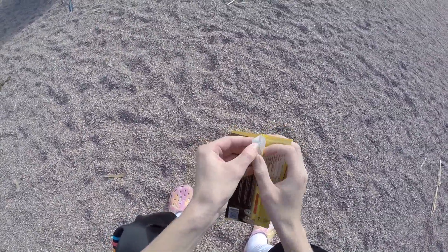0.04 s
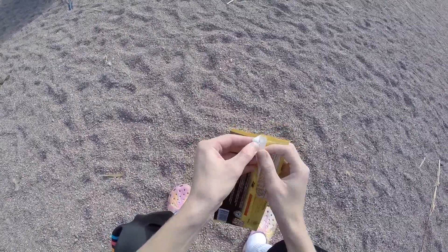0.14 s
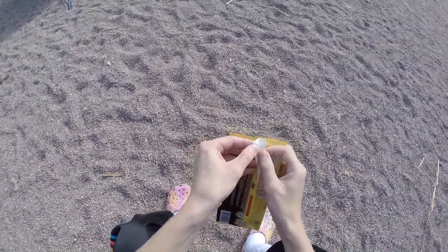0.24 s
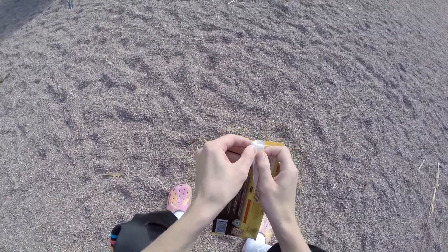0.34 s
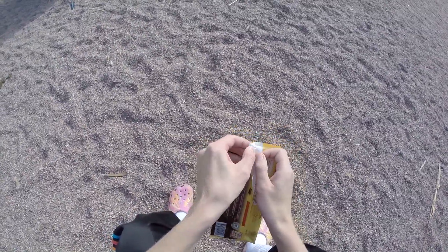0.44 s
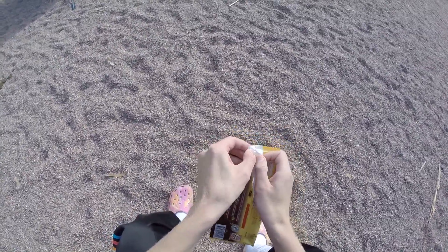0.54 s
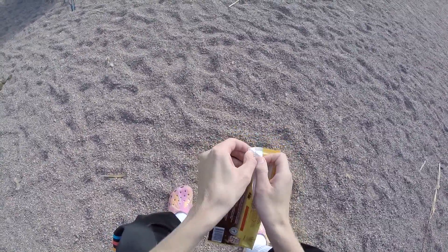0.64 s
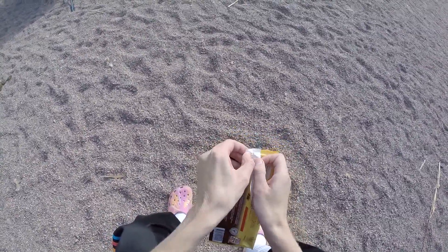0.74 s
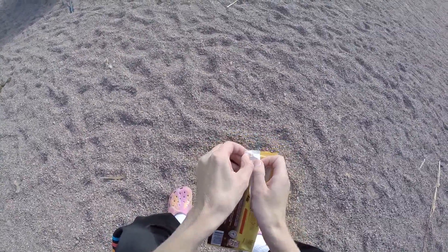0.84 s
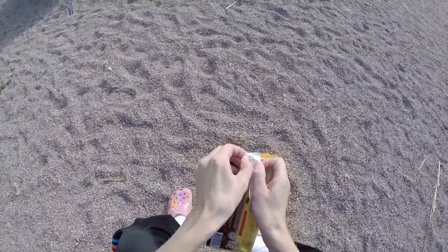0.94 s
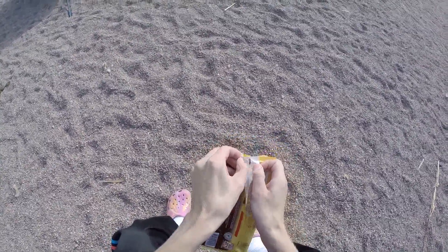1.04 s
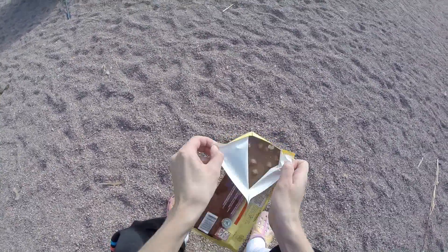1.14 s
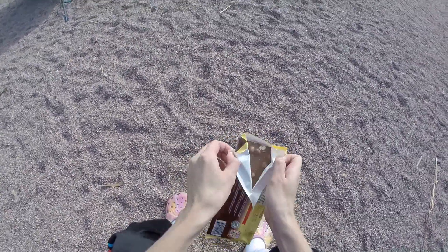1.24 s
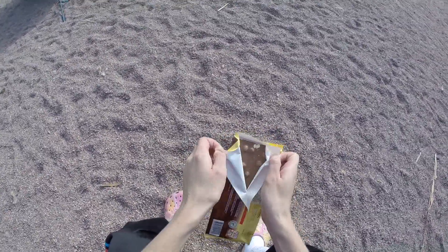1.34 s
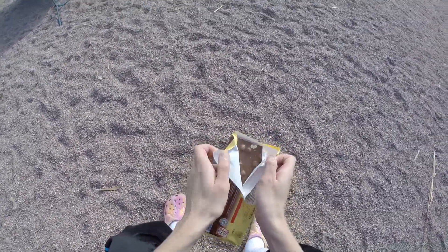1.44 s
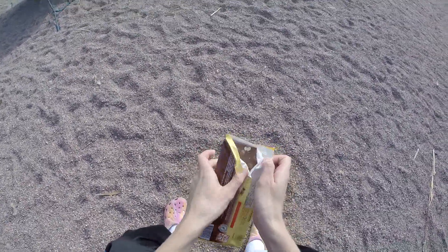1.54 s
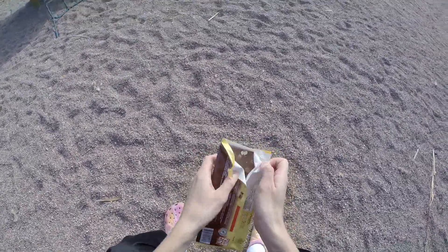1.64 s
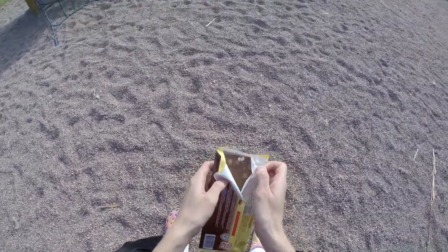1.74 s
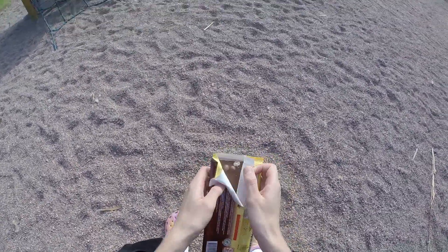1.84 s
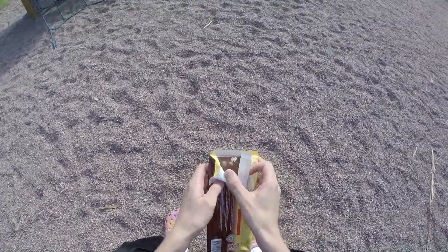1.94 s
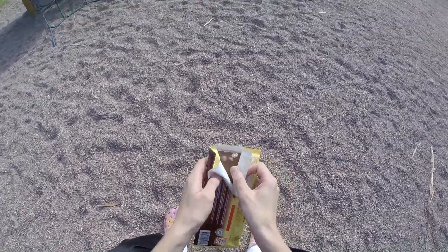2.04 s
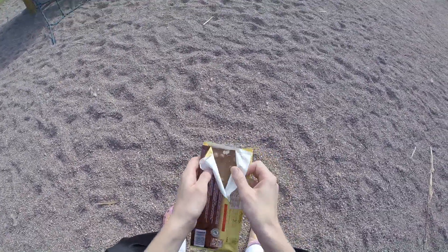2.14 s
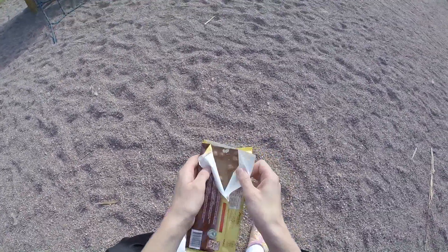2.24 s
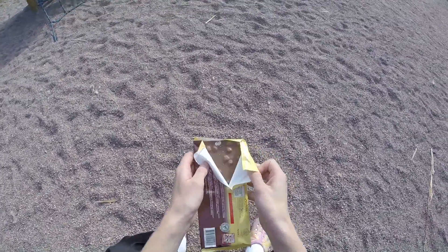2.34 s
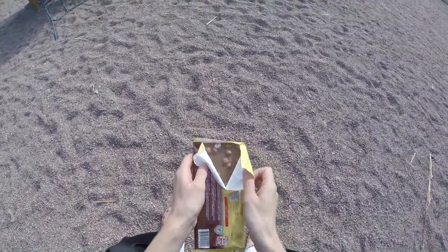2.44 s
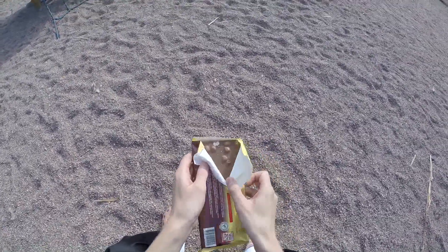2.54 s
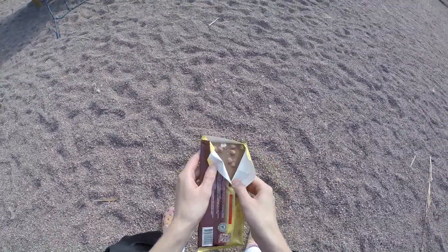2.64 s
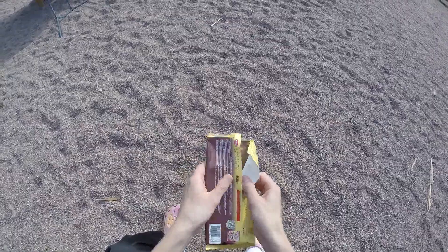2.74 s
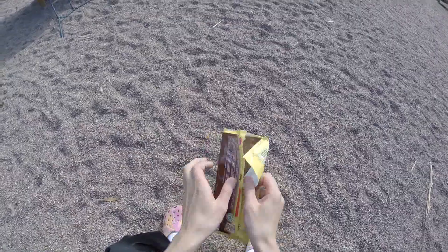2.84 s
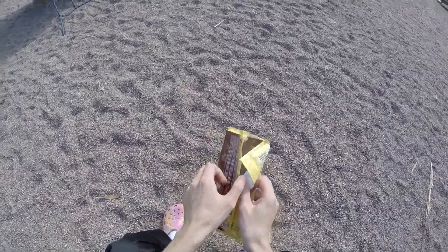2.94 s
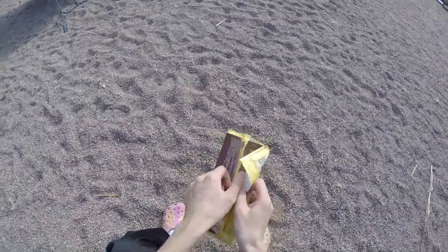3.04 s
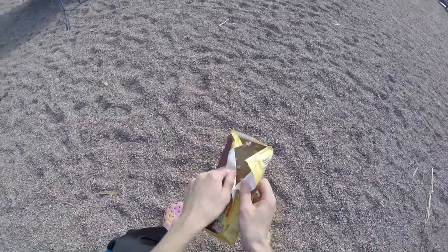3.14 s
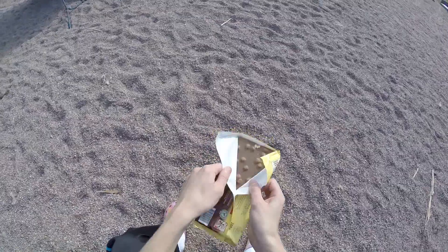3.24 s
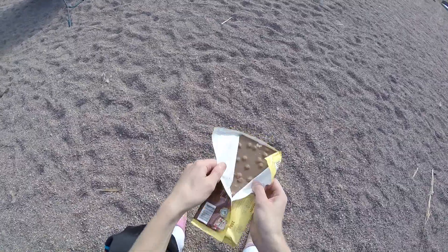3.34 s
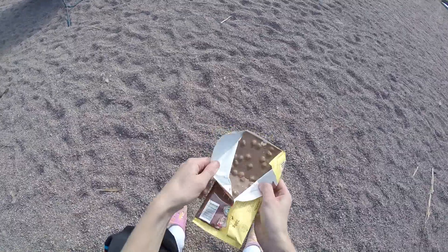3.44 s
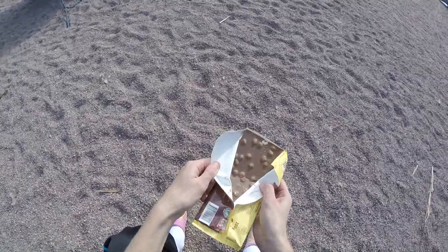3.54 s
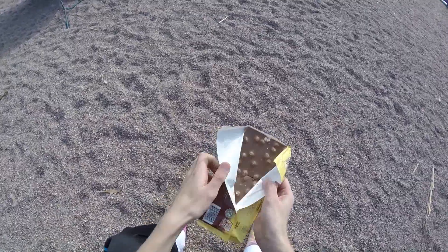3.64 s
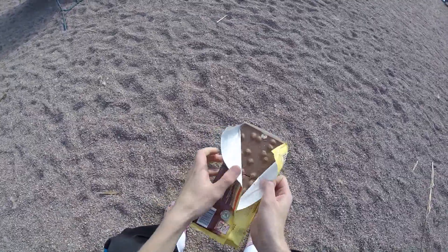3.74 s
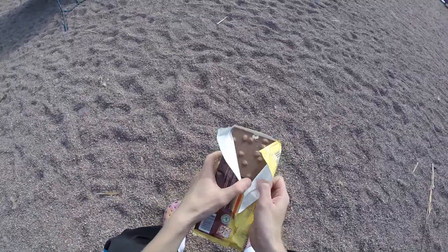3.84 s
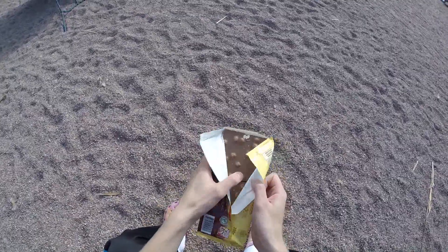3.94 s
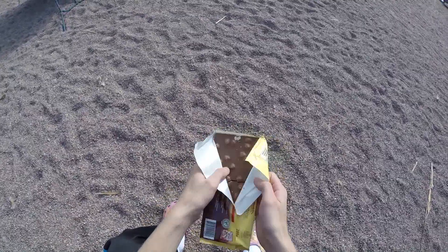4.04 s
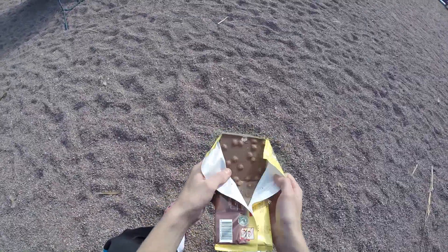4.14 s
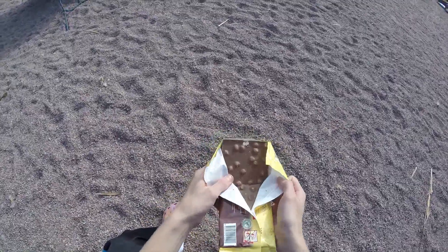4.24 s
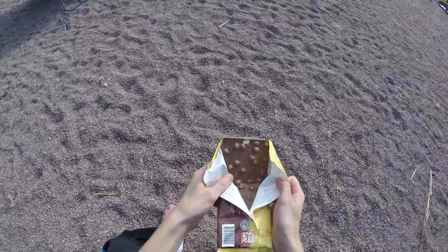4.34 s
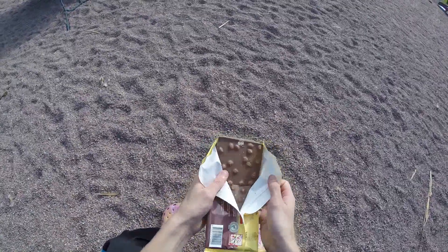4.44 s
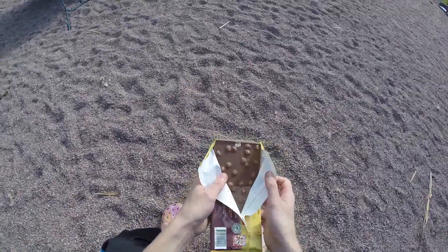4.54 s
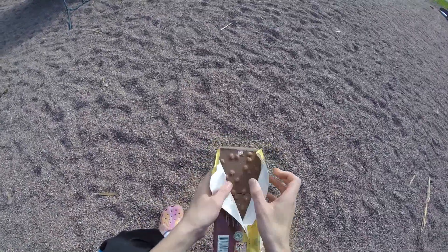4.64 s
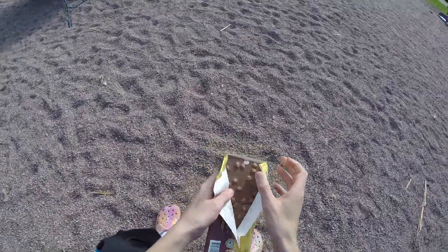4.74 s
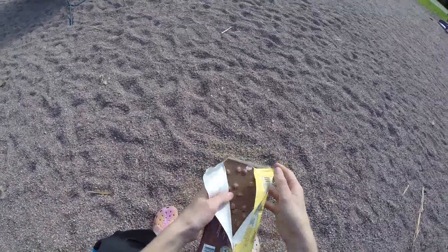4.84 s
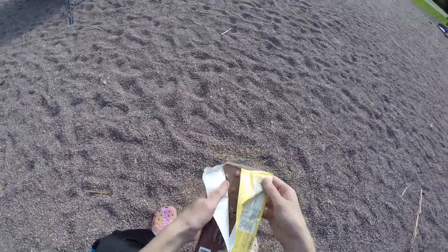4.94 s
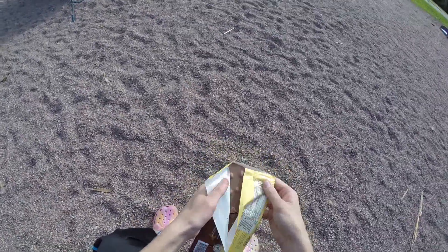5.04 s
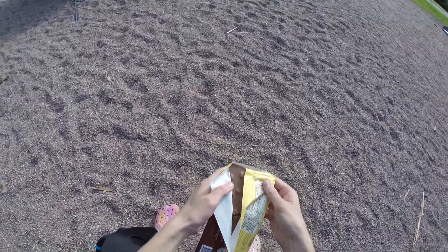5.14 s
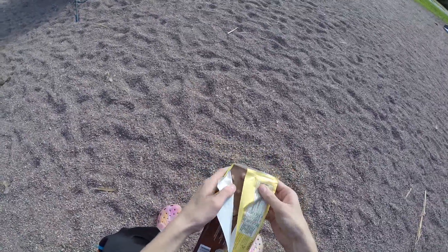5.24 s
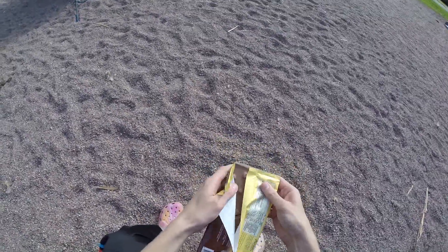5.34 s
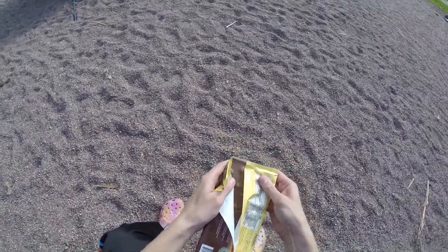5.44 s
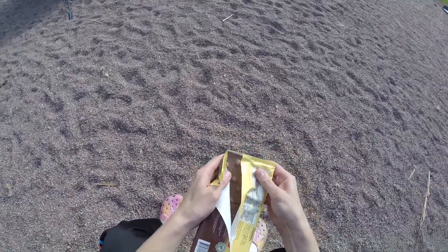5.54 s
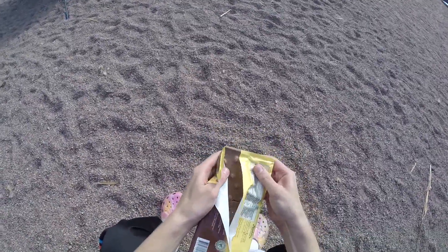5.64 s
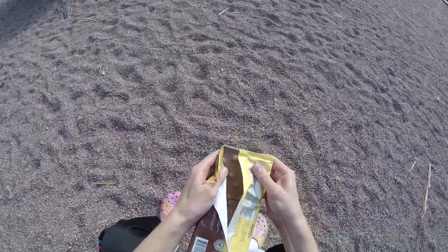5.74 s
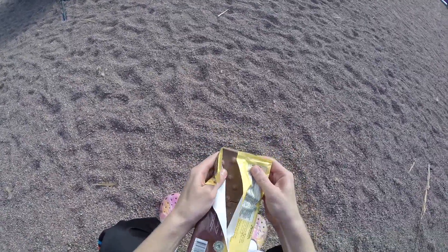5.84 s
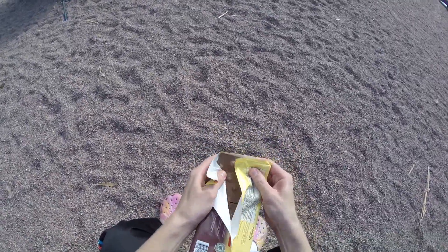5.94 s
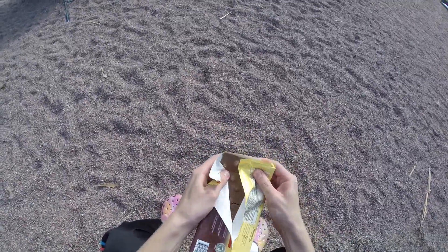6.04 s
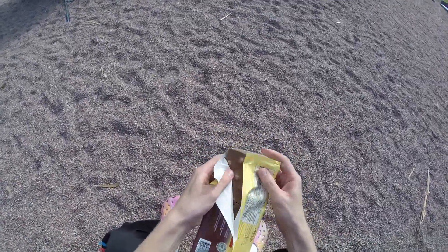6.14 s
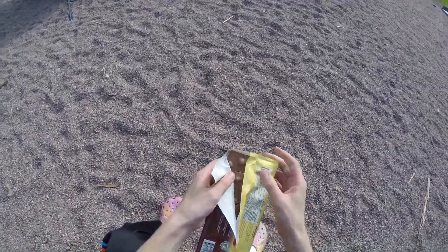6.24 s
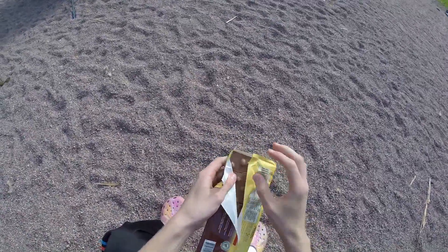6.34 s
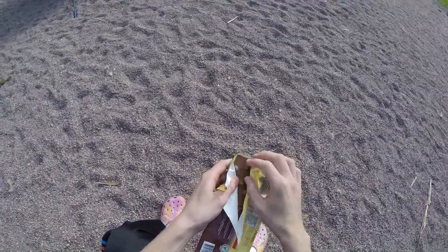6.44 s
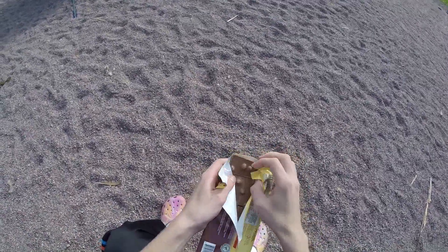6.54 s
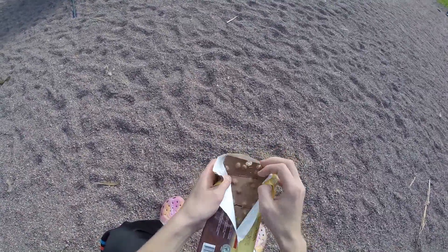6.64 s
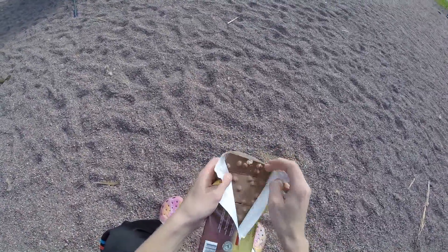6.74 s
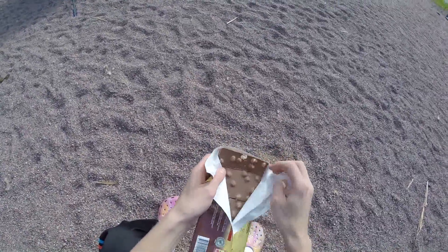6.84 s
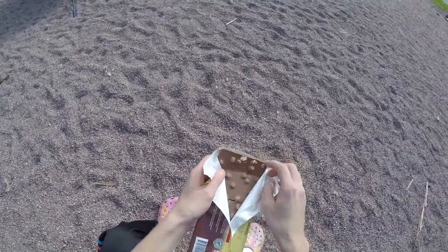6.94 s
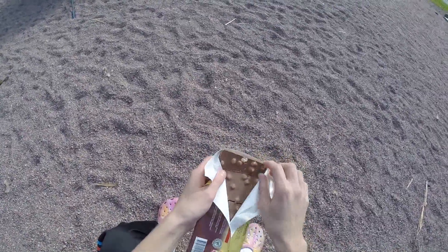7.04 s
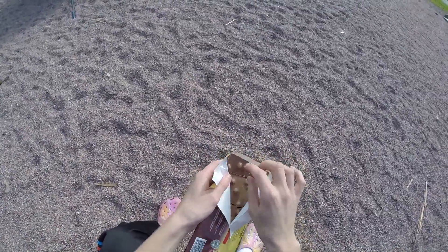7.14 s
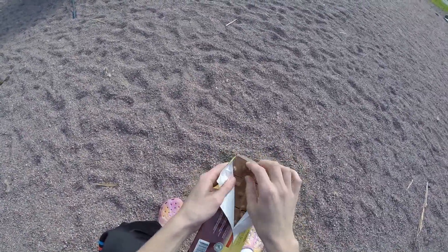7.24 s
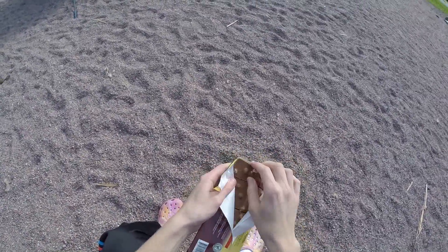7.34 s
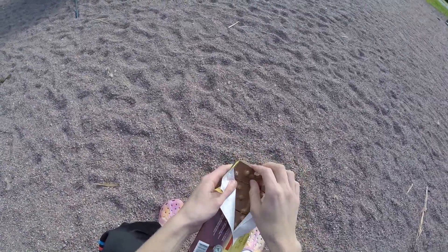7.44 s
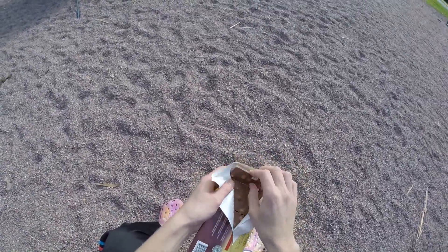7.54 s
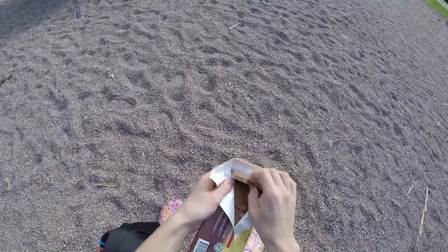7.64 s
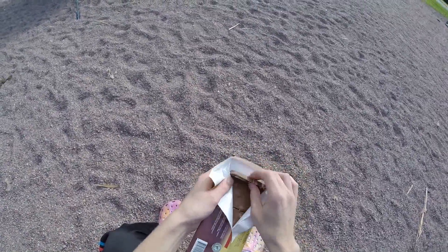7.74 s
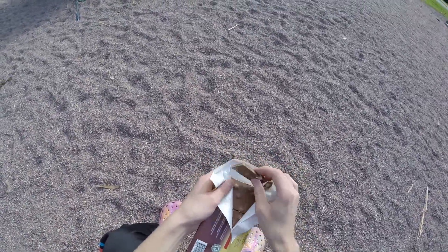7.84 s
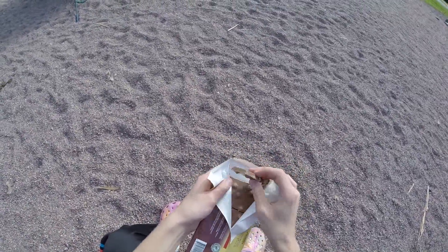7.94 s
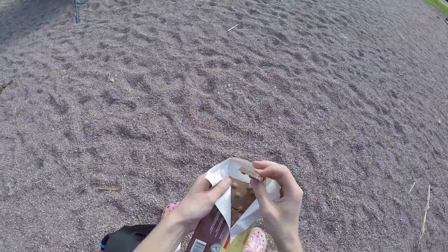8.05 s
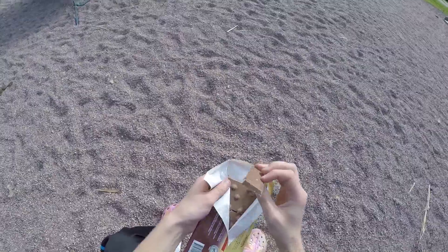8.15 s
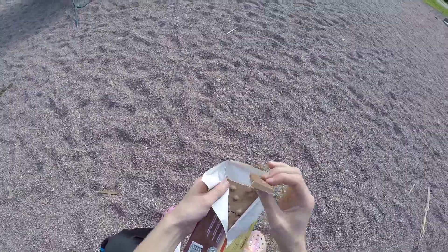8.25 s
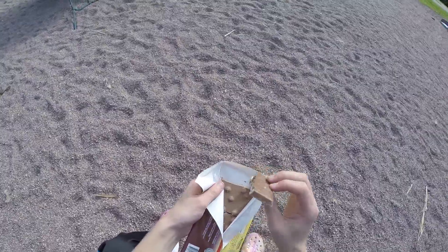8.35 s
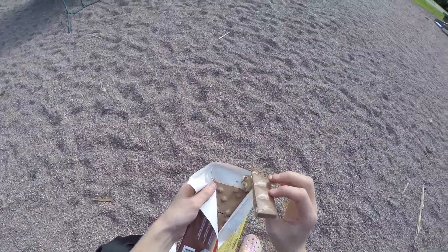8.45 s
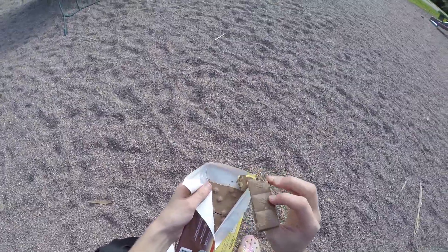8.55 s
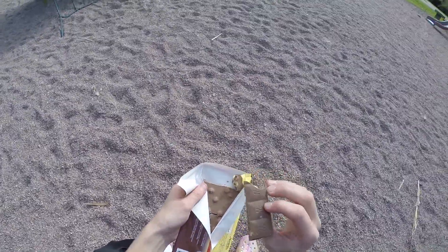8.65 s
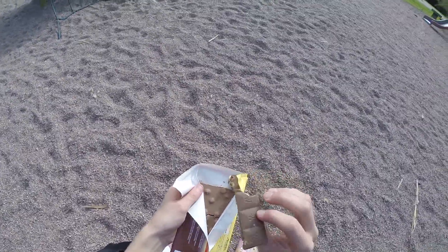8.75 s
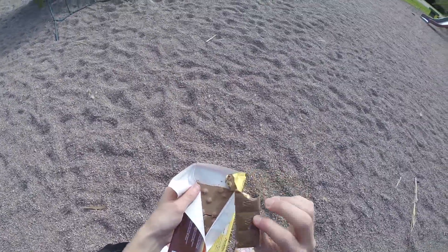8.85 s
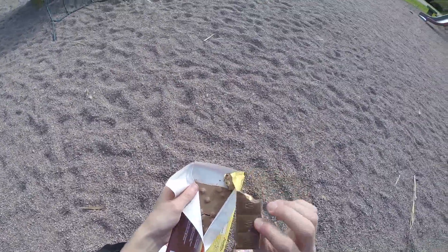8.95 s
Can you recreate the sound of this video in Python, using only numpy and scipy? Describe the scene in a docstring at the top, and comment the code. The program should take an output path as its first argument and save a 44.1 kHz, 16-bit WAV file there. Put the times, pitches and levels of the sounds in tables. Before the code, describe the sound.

Crisp film wrapper handling, dry and near, outdoors without noticeable echo. Dull pops joined to bright snaps come in uneven clusters, with tiny crackles fusing into brief rips and low soft thumps as the pack bends. The sharpest burst is early, another dense one comes near seven seconds, then it calms. The small microphone housing gives a hollow, ringing, slightly muffled colour over soft air and far traffic.

```python
"""Sharp snaps and dense bursts of crackle: hands peel the wrapper off a chocolate bar, close under a small camera.
Each crease in the stiff film is a dull noise pop plus a bright crack; tearing seams are random puffs that fuse.
Low flexing thumps and a faint far whine are sines; open air and far traffic rumble are coloured noise.
A microphone housing rings through resonators and colours everything."""
import sys
import numpy as np
from scipy import signal
from scipy.fft import rfft, irfft
from scipy.io import wavfile

SR = 44100
rng = np.random.default_rng(int(sys.argv[2]) if len(sys.argv) > 2 else 0)


def to_wav(sig):
    """Store sig (one row per channel, or 1-D mono) as 16-bit WAV at the path in sys.argv[1].

    Samples outside -1..1 are clipped; the rate is SR.
    """
    pcm = np.clip(np.atleast_2d(sig), -1, 1) * 32767
    pcm = np.round(pcm).astype(np.int16)
    wavfile.write(sys.argv[1], SR, pcm.T)  # frames by channels


N = 396009

# open-air noise spectrum before the housing: (frequency [Hz], relative density [dB per Hz])
AIR_SPECTRUM = [(22, -7.5), (80, 0.5), (200, -7), (480, -14.5), (1000, -15), (1600, -23.5), (4200, -28),
                (9000, -37), (15000, -44)]
# far traffic rumble: (time [s], level [dB])
RUMBLE_LEVEL = [(0, -48.5), (5.1, -44.5), (8.0, -42.5), (8.98, -42)]
# faint far whine: (start [s], end [s], frequency [Hz], level [dB])
WHINE_TONE = (5.65, 6.7, 1250, -69)
# whole pack flexing in the hands: (time [s], level [dB])
PACK_THUMPS = [(1.199, -30), (1.304, -25), (3.469, -21), (4.235, -29.5), (5.112, -33.5), (6.908, -26),
               (7.586, -29)]
# single creases snapping, loud and faint: (time [s], dull pop level [dB], bright crack re pop [dB], fold pitch [Hz])
CREASE_SNAPS = [(0.0402, -40.5, 6.5, 4170), (0.1213, -35, 1.0, 3560), (0.3772, -33, 4.5, 5200),
                (0.4164, -32.5, 3.5, 3750), (0.5602, -34.5, -10.5, 3000.0), (0.6928, -24, -4.5, 3250),
                (1.1536, -11, -6, 4830), (1.1807, -26, 9, 2500.0), (1.2028, -11, -12, 3900.0),
                (1.2676, -29.5, -3.5, 4100.0), (1.309, -31.5, 1, 2950), (1.3175, -38, 13, 2160),
                (1.4611, -39.5, 7.5, 3040), (1.623, -36.5, 5, 4140), (1.7766, -37, 8, 3750),
                (1.8897, -32.5, 3.5, 3530), (2.1037, -51, 26.5, 4350), (2.1612, -50, 21, 4500.0),
                (2.3146, -37, 9, 5270), (2.3759, -33, 5.5, 4280), (2.3913, -37, 1, 4000.0),
                (2.418, -23.5, -6.5, 3500.0), (2.4429, -17.5, -28, 3700.0), (2.5275, -30.5, 0, 7460),
                (2.5346, -27, -9.5, 5000.0), (2.601, -34.5, 4.5, 5370), (2.6832, -39.5, 5.5, 3540),
                (2.7457, -25.5, 0, 4180), (2.8902, -33, -10, 4060), (3.296, -27, 5, 4330),
                (3.3032, -32.5, 11, 3330), (3.4731, -21.5, -1.5, 4600.0), (3.656, -36.5, 6.5, 5770),
                (3.7427, -34.5, 1.5, 5000), (3.863, -31, 2, 3900), (4.1125, -30.5, 4.5, 4070),
                (4.1842, -25.5, -3.0, 5800.0), (4.1981, -33, 7.5, 5100), (4.2348, -18, -8.5, 3820),
                (4.245, -20, -8, 3740), (4.2602, -30.5, 3, 4270), (4.4354, -29.5, -8, 3130),
                (4.6595, -30.5, 1, 4000), (4.732, -41, 11.5, 3600.0), (5.051, -25, 3, 5650),
                (5.0914, -29.5, 5, 4350), (5.1155, -20, -5.5, 4300.0), (5.1364, -40.5, 15.5, 4770),
                (5.1491, -37.5, 10.5, 5160), (5.3344, -46, 14.5, 3380), (5.4192, -42, 13, 5000),
                (5.485, -24.5, -6.5, 4370), (5.5289, -30, 9, 4600), (5.5491, -28, 9, 5050),
                (5.5582, -37, 9, 4900.0), (5.5648, -27.5, 1, 4240), (5.5788, -34.5, 2.5, 3180),
                (5.6489, -27.5, 8.5, 4060), (5.69, -36, 3, 5800.0), (5.708, -40, 13.5, 6200.0),
                (5.8022, -39.5, -19, 2500.0), (5.8838, -25.5, 5, 5200), (5.9715, -25, -1.5, 5640),
                (5.9847, -27.5, 6, 5030), (5.9987, -25, -2, 5800.0), (6.1877, -45.5, 19.5, 5400),
                (6.281, -41, 17.5, 5300.0), (6.315, -39.5, 20.5, 5600), (6.5288, -33.5, -18, 2530),
                (6.5671, -36.5, 10, 3400.0), (6.5997, -32, -4, 4200.0), (6.7296, -30, 3, 2870),
                (6.8988, -21, -6, 3700.0), (6.9118, -19, -1.5, 2780), (6.922, -17, -7.5, 3300.0),
                (6.9277, -15, -14, 3300.0), (6.9506, -16.5, -11, 5000.0), (6.9959, -31.5, 6, 3500.0),
                (7.0449, -32.5, 7, 4640), (7.1948, -30.5, -8, 3300.0), (7.303, -30.5, -4.5, 2460),
                (7.5097, -35, -5.5, 4200), (7.59, -25.5, 0.0, 3300), (7.612, -32, -8, 3120),
                (7.6415, -32.5, -3.5, 3600.0), (8.123, -42, 6.5, 4100), (8.2132, -45, -1, 2200.0),
                (8.2411, -35, -0.5, 3130)]
# hands on the pack between pulls: (time [s], idle rustle level [dB], bright folds re dull patches [dB])
IDLE_HANDLING = [(0, -67, 13), (0.5, -45.5, -7), (0.6, -65, -1), (1.1, -57, -1), (1.35, -47, -4.5),
                 (2.3, -50, -9.5), (2.8, -53.5, -10), (3.3, -51, -6), (3.45, -60, -9), (3.6, -51, -10.5),
                 (4.6, -65, -14.5), (5.1, -45.5, -4), (6.0, -61, -8), (6.9, -42, -12.5), (7.1, -44, -12),
                 (8.25, -63.5, -13.5), (8.98, -69, -15)]
# pulls on the film, light tug to tearing seam: (start [s], length [s], level [dB])
FILM_PULLS = [(1.117, 0.12, -33), (1.153, 0.047, -18.5), (1.778, 0.042, -34), (1.888, 0.045, -36.5),
              (2.21, 0.1, -34.5), (2.375, 0.063, -25.5), (2.524, 0.059, -33), (2.723, 0.099, -33.5),
              (3.27, 0.27, -33), (3.432, 0.033, -18), (3.662, 0.062, -29), (3.786, 0.14, -36.5),
              (4.013, 0.12, -32.5), (4.165, 0.11, -31.5), (4.204, 0.024, -21), (4.384, 0.082, -37.5),
              (4.497, 0.057, -31.5), (4.649, 0.041, -31.5), (4.971, 0.15, -36), (5.47, 0.055, -33.5),
              (6.206, 0.13, -33.5), (6.53, 0.17, -36), (6.775, 0.3, -35.5), (6.829, 0.0081, -24.5),
              (6.863, 0.017, -16.5), (6.896, 0.03, -23.5), (7.129, 0.031, -38), (7.882, 0.032, -41),
              (7.743, 0.028, -34)]
# housing cavities and the dips between them: (frequency [Hz], width [Hz], full boost or cut [dB])
HOUSING_MODES = [(1113, 420, 12.5), (1430, 580, -7.5), (2180, 566, 9.5), (3023, 165, 7), (3290, 4500, -3),
                 (4197, 340, 12.5), (6300, 390, 10)]

SETTLE_S = 0.0063  # time constant of the film following a pull and quietening after it
NEAR_SHARE, DIFFUSE_SHARE = 0.96, 0.39  # share of each housing boost; sound from all sides stirs it less
CUTOFF_HZ = 16500


def amp(db):
    """Decibels to gain."""
    return 10 ** (np.asarray(db) / 20)


def rms_one(x):
    """Scales each row to rms 1."""
    return x / np.sqrt(np.mean(x ** 2, axis=-1, keepdims=True) + 1e-20)


def one_ms(x):
    """Scales each row to the energy of a 1 ms stretch of rms 1."""
    return rms_one(x) * np.sqrt(SR / 1000 / x.shape[1])


def in_time(rows):
    """Interpolates (time [s], value) rows to every sample."""
    return np.interp(np.arange(N) / SR, *np.transpose(rows))


def lowpass(x, order, cutoff_hz):
    """Butterworth low-pass."""
    return signal.sosfilt(signal.butter(order, cutoff_hz, fs=SR, output="sos"), x)


def band(x, low_hz, high_hz, order=1):
    """Band-pass with gentle skirts."""
    edges_hz = [low_hz, min(high_hz, .45 * SR)]
    return signal.sosfilt(signal.butter(order, edges_hz, "band", fs=SR, output="sos"), x)


def drift(rate_hz):
    """Random wander of rms 1: noise twice through a one-pole low-pass."""
    r = np.exp(-2 * np.pi * rate_hz / SR)
    noise = rng.standard_normal(N + SR)
    wander = signal.lfilter([1], [1, -2 * r, r * r], noise)
    return rms_one(wander[SR:])  # first second dropped: filter start-up


def place(start_s, sounds):
    """Adds rows of sound at their start times."""
    out = np.zeros(N + sounds.shape[1])
    for start, sound in zip(np.round(start_s * SR).astype(int), sounds):
        out[start:start + len(sound)] += sound
    return out[:N]


def outdoors():
    """Open-air noise; its bass is traffic that swells, and the whole wavers slowly."""
    hz = np.maximum(np.arange(N // 2 + 1) * SR / N, 1)
    node_hz, node_db = np.transpose(AIR_SPECTRUM)
    colour = amp(np.interp(np.log(hz), np.log(node_hz), node_db))
    air = rms_one(irfft(rfft(rng.standard_normal(N)) * colour, N))
    bass = lowpass(air, 2, 140)
    waver_db = 1.2 * drift(2)
    rumble = amp(in_time(RUMBLE_LEVEL) + waver_db) * bass
    return rumble + amp(waver_db - 49.5) * (air - bass)


def whine():
    """A thin sine of fixed pitch that fades in and out."""
    start_s, end_s, hz, level_db = WHINE_TONE
    t = np.arange(N) / SR
    fade = np.clip(np.minimum(t - start_s, end_s - t) * 10, 0, 1)  # 0.1 s ramps
    return amp(level_db) * fade * np.sin(2 * np.pi * hz * t)


def thumps():
    """Flexes of bar and sleeve: 280 Hz sines that swell and die within milliseconds."""
    time_s, level_db = np.transpose(PACK_THUMPS)
    t, swell_s = np.arange(2048) / SR, .0016
    envelope = t / swell_s * np.exp(1 - t / swell_s)
    flex = envelope * np.sin(2 * np.pi * 280 * t)
    return place(time_s, amp(level_db)[:, None] * flex)


def burst(noise, rise_s, fall_s, tail_db):
    """Shapes rows of noise into a quick crack with a faint rattling tail four times as long."""
    t = np.arange(noise.shape[1]) / SR
    rise = (1 - np.exp(-t / rise_s)) ** 2
    fall = np.exp(-t / fall_s) + amp(tail_db) * np.exp(-t / fall_s / 4)
    return noise * rise * fall


def snaps():
    """Each crease gives a dull pop that rings the sheet and a bright crack at the pitch of its own fold."""
    time_s, pop_db, crack_db, fold_hz = np.transpose(CREASE_SNAPS)
    noise = rng.standard_normal((len(time_s), 2, 1024))
    pop = band(burst(noise[:, 0], 0.00026, 0.00093, -10.5), 703, 1460, order=2)
    crack = band(burst(noise[:, 1], 0.00011, 0.00046, -6.5), 1130, 8700)
    octaves = np.log2(np.arange(1, 514) * SR / 1024 / fold_hz[:, None])
    fold_colour = amp(-7) + np.exp(-(octaves / 0.76) ** 2)
    crack = irfft(rfft(crack) * fold_colour)
    snap = one_ms(pop) + amp(crack_db)[:, None] * one_ms(crack)
    return place(time_s - .0015, amp(pop_db)[:, None] * snap)  # onset leads the table time


def cracks(power, low_hz, high_hz):
    """Tiny cracks, puffs of noise in clumps; the harder the pull, the denser, until they fuse into a tear."""
    per_s = np.minimum(90 * (power / amp(-80)) ** 0.52, SR)
    clump_db = 2.47 * drift(99)
    sizes = amp(4.7 * np.minimum(rng.exponential(1, N), 2.8) + clump_db)
    hits = rng.random(N) < per_s / SR
    starts = rms_one(sizes) ** 2 * hits * power * SR / per_s  # over the rate: mean power stays at the pull's level
    fade = np.exp(-1 / (0.00067 * SR))
    puff_power = signal.lfilter([(1 - fade) ** 2], [1, -2 * fade, fade ** 2], starts + 1e-18)
    slide = amp(-26) * np.sqrt(power)  # fingers sliding on the film hiss between cracks
    return band((np.sqrt(puff_power) + slide) * rng.standard_normal(N), low_hz, high_hz, order=2)


def rustle():
    """Wide patches of film crackle dull; folds of three sizes crackle bright, each at moments of its own."""
    time_s, idle_db, bright_db = np.transpose(IDLE_HANDLING)
    pulled = np.zeros(N)  # power
    for start_s, length_s, level_db in FILM_PULLS:
        pulled[round(start_s * SR):round((start_s + length_s) * SR)] += amp(level_db) ** 2
    fade = np.exp(-1 / (SETTLE_S * SR))
    settled = signal.lfilter([1 - fade], [1, -fade], pulled + 1e-18)
    dull = amp(in_time(np.c_[time_s, idle_db])) ** 2 + settled
    bright = dull * amp(in_time(np.c_[time_s, bright_db])) ** 2
    folds = cracks(bright, 1550, 4400) + cracks(bright, 2260, 8200)
    folds = folds + amp(-17.0) * cracks(bright, 5500, 16200)
    return cracks(dull, 288, 1366) + folds


def housing(x, share):
    """Two-pole resonators in series lift or cut their bands by a share of the full dB."""
    for hz, width_hz, boost_db in HOUSING_MODES:
        r = np.exp(-np.pi * width_hz / SR)
        zeros = (1 - r * r) / 2 * np.array([1, 0, -1])
        poles = [1, -2 * r * np.cos(2 * np.pi * hz / SR), r * r]
        x = x + (amp(share * boost_db) - 1) * signal.lfilter(zeros, poles, x)
    return x


def scene():
    """Wrapper and whine, then diffuse air, through the housing."""
    near = snaps() + rustle() + thumps() + whine()
    return (housing(near, NEAR_SHARE) + housing(outdoors(), DIFFUSE_SHARE))[None]


def record(dry):
    """The microphone port dulls the top, peaks are rounded, the top is cut."""
    dulled = lowpass(dry, 1, 7000)
    rounded = 1.198 * np.tanh(dulled / 1.125)
    return signal.sosfilt(signal.cheby2(12, 70, CUTOFF_HZ, fs=SR, output="sos"), rounded)


dry = scene()
out = record(dry)
to_wav(out)
```